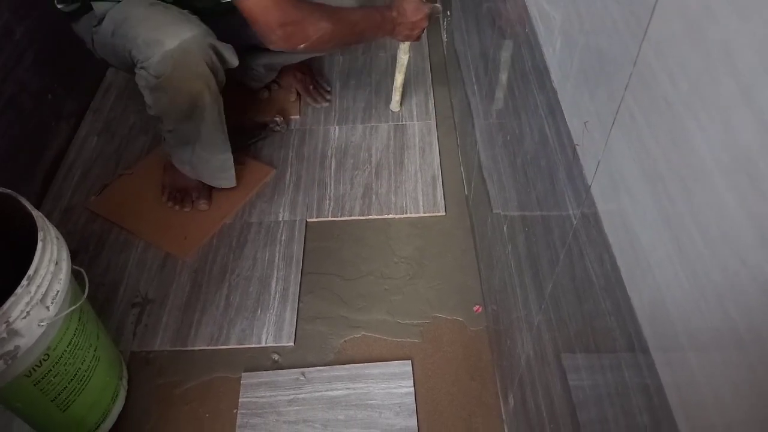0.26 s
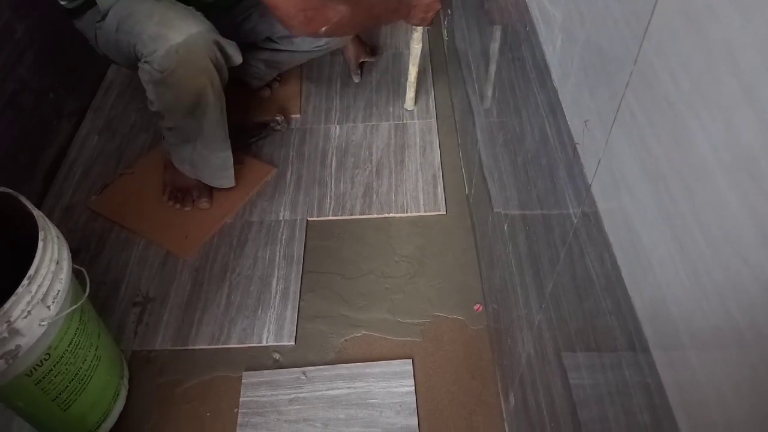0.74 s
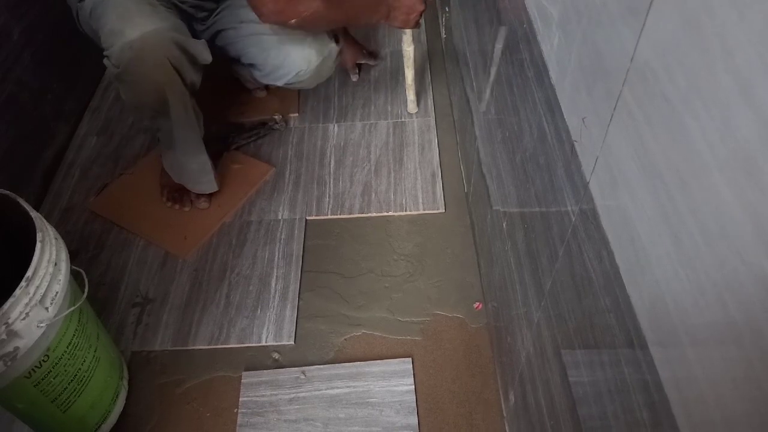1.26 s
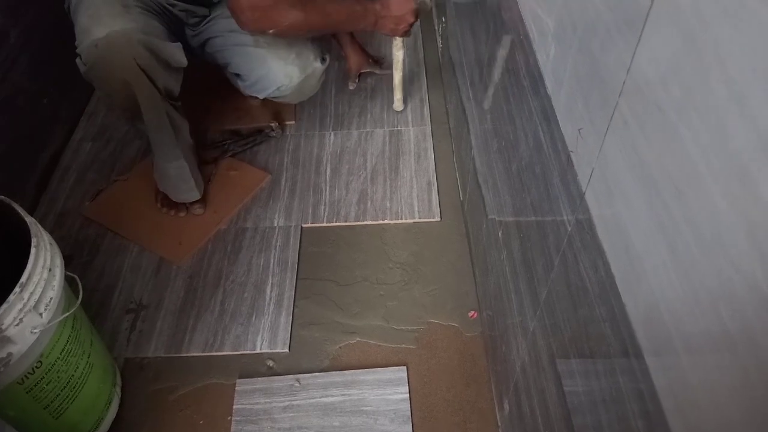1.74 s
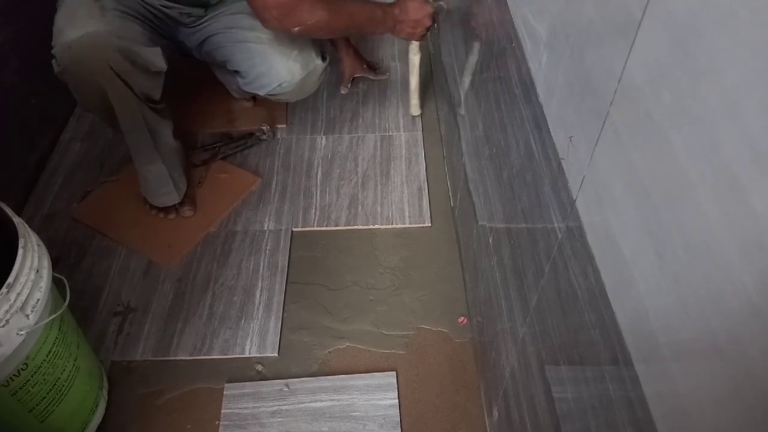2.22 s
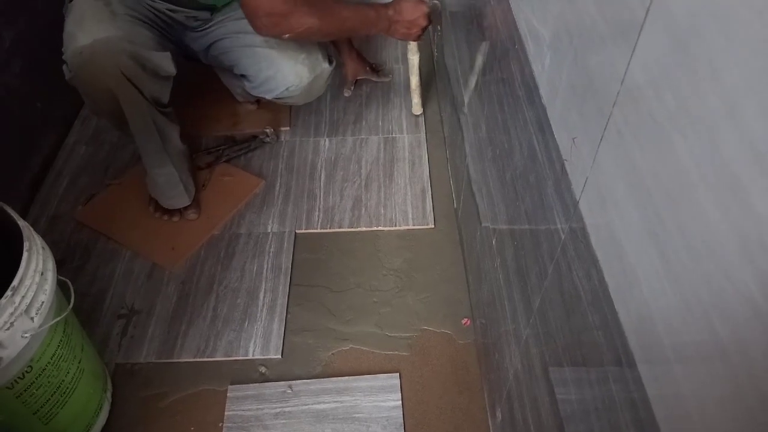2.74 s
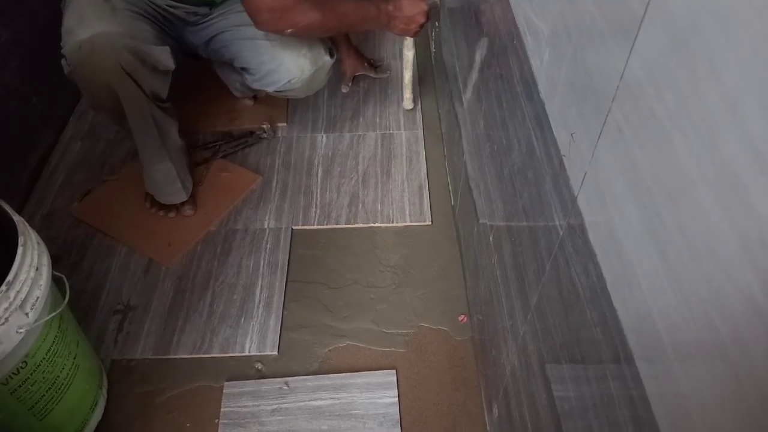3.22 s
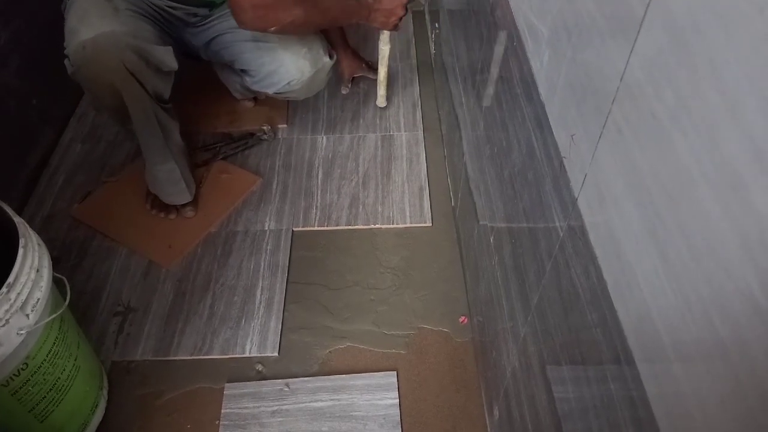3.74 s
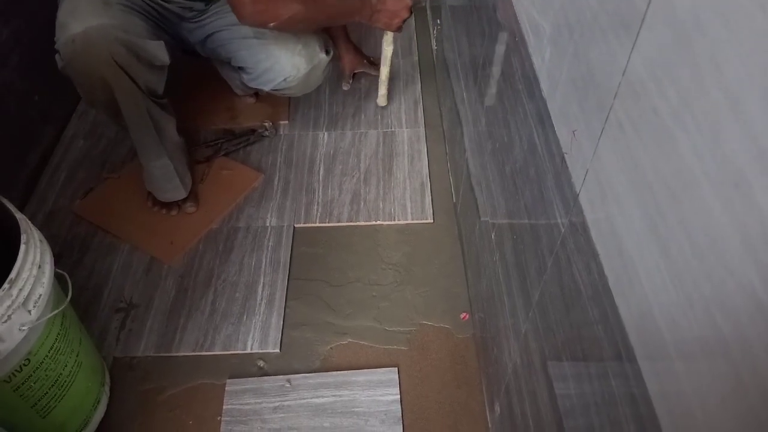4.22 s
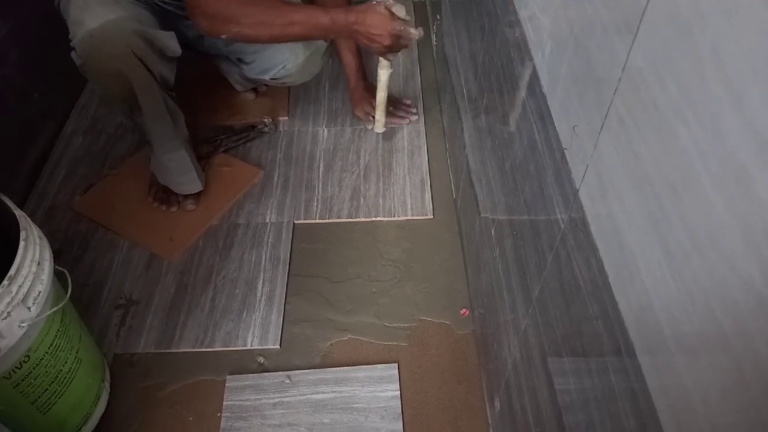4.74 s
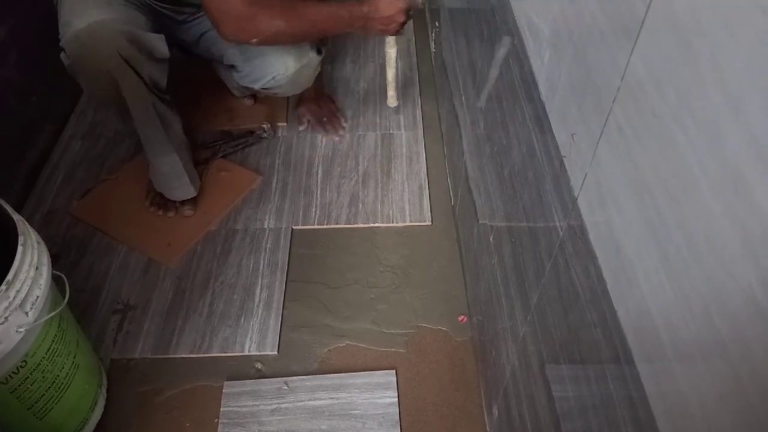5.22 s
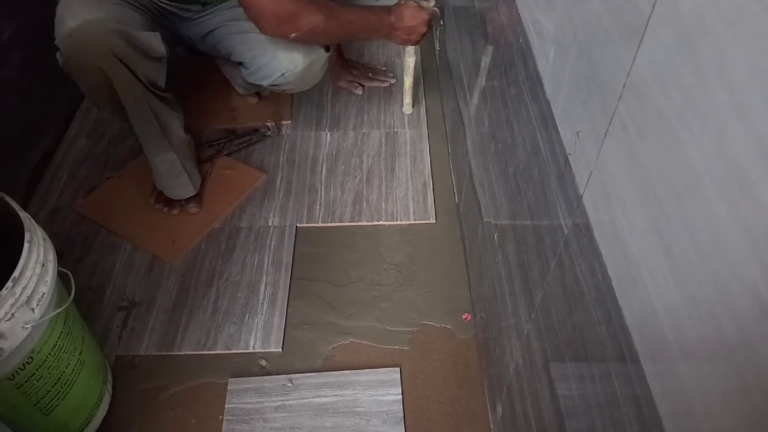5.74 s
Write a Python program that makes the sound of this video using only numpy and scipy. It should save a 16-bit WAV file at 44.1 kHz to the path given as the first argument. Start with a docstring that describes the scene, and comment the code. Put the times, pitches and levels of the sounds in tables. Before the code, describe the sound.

Quick, regular mallet knocks on a floor tile, close and loud, with hard room reflections and an occasional tiny high chink. They stop around four seconds, a soft scuff passes, and a final pair follows before faint distant tones. Low engine throb and drone, dark rumble and unsteady thin hiss lie beneath. Left channel holds the scene; right holds only steady electrical noise.

```python
"""An engine idles outside over a low rumble and a wavering hiss; the right channel is steady circuit noise.
A tiler then beds a floor tile in mortar with quick mallet knocks: short dead rings filling a small bare room.
A soft scuff falls in the pause, two more knocks follow, and faint far-off tones come in at the end.
Tile and room are damped sines, echoes and hiss are coloured noise, the engine is filtered pulses and a sine.
The microphone feeds the left channel only."""
import sys
import numpy as np
from scipy import signal
from scipy.fft import rfft, irfft
from scipy.io import wavfile
from scipy.ndimage import uniform_filter1d

SR = 44100
rng = np.random.default_rng(int(sys.argv[2]) if len(sys.argv) > 2 else 0)


def transcribe(signal):
    """Save signal, clipped to [-1, 1], as a 16-bit WAV file at the path in sys.argv[1]."""
    frames = np.atleast_2d(signal).T
    limited = np.clip(frames, -1, 1)
    pcm = np.round(limited * 32767).astype(np.int16)
    wavfile.write(sys.argv[1], SR, pcm)


N = 263718
TIME = np.arange(N) / SR
RING = TIME[:SR]  # one second, the time axis of every ring
# how long the room's echoes ring: (frequency [Hz], t60 [s])
ECHO_T60 = [(100, 0.75), (250, 0.48), (700, 0.46), (1500, 0.34), (4000, 0.38), (10000, 0.24)]


def undb(db):
    """Decibels to gain."""
    return 10 ** (np.asarray(db) / 20)


def at_hz(hz, points):
    """Read (frequency [Hz], value) points on a log-frequency axis."""
    point_hz, value = np.transpose(points)
    return np.interp(np.log(np.maximum(hz, 1)), np.log(point_hz), value)


def at_time(points):
    """Draw a level envelope through (time [s], level [dB]) points."""
    return np.interp(TIME, *np.transpose(points))


def level(x, db):
    """Bring to an rms of 1, then apply a fixed or moving gain in dB."""
    return x * undb(db) / np.sqrt(np.mean(x ** 2))


def colour(x, points):
    """Equalise through (frequency [Hz], gain [dB]) points, minimum-phase so nothing rings ahead."""
    size = 8192
    hz = np.arange(size // 2 + 1) * SR / size
    # folding the cepstrum onto positive time makes the filter causal
    cepstrum = irfft(np.log(undb(at_hz(hz, points))))
    cepstrum[1:size // 2] *= 2
    cepstrum[size // 2 + 1:] = 0
    impulse = irfft(np.exp(rfft(cepstrum)))
    return signal.fftconvolve(x, impulse)[:len(x)]


def noise(points, db):
    """Random noise of a given colour and level."""
    return level(colour(rng.standard_normal(N), points), db)


def swell(start, length):
    """A smooth half-sine rise and fall."""
    return np.sin(np.pi * np.clip((TIME - start) / length, 0, 1))


def fade(t60):
    """Exponential decay, 60 dB down after t60 seconds."""
    return np.exp(-np.log(1000) * RING / t60)


def mode(hz, db, t60):
    """One damped vibration: a sine that dies away."""
    return undb(db) * np.sin(2 * np.pi * hz * RING) * fade(t60)


def low_pass(x, hz):
    """Gently round off everything above a frequency."""
    return signal.sosfilt(signal.butter(2, hz, fs=SR, output="sos"), x)


def add(out, start, x):
    """Mix a sound in at a time in seconds."""
    first = int(start * SR)
    out[first:first + len(x)] += x


def engine(firing_hz=16.15, drone_order=10, unevenness_db=0.6):
    """Evenly timed firings throb through the walls; one of their overtones drones in the room."""
    # level of the idling engine: (time [s], throb level [dB], drone level [dB])
    idle = [(0, -46.5, -58), (1.001, -42.5, -47), (2.5, -44.5, -45), (4.2, -42.5, -43.5),
            (4.55, -47, -39.5), (5.0, -41.5, -37), (5.55, -38, -42), (5.98, -37.5, -38)]
    # the engine as it comes through the walls: (frequency [Hz], gain [dB])
    through_walls = [(40, -55.5), (70, -39), (85, -9.5), (115, -2), (160, 2.5), (185, -1.5), (215, -23),
                     (247, -5), (280, -13.5), (450, -27.5), (900, -53.5)]
    start, throb_db, drone_db = np.transpose(idle)
    turns = firing_hz * TIME
    firings = np.flatnonzero(np.diff(np.floor(turns)))
    pulses = np.zeros(N)
    pulses[firings] = undb(unevenness_db * rng.standard_normal(len(firings)))
    throb = level(colour(pulses, through_walls), np.interp(TIME, start, throb_db))
    drone = np.sin(2 * np.pi * drone_order * turns)
    return throb + level(drone, np.interp(TIME, start, drone_db))


def hiss(trim_db=-1):
    """Thin coloured noise that swells and sinks during the knocking and is steadier in the pause."""
    # movement of the hiss ahead of the trim: (time [s], level [dB])
    hiss_level = [(0.0, -48), (0.42, -53), (0.53, -43.5), (0.78, -54.5), (1.14, -55.5), (1.32, -47),
                  (1.58, -58.5), (1.84, -44), (2.18, -54), (2.48, -56), (2.68, -40), (2.97, -56.5),
                  (3.23, -42), (3.48, -51), (3.99, -62.5), (4.28, -39.5), (4.42, -44.5), (5.12, -42),
                  (5.25, -48.0), (5.98, -40.8)]
    # its colour: (frequency [Hz], gain [dB])
    hiss_colour = [(300, -12), (1500, -8), (3000, -7), (4400, 0.5), (5000, -7.5), (5900, -9), (6300, 3.5),
                   (7500, 2), (8400, -2.5), (8900, -16.5), (11000, -12), (12500, -9.5), (15500, -11.5)]
    return noise(hiss_colour, trim_db + at_time(hiss_level))


def rumble():
    """Distant outdoor rumble: dark noise with a slowly moving level."""
    # colour of the rumble: (frequency [Hz], gain [dB])
    rumble_colour = [(25, -7), (55, -15), (100, 3), (170, -1), (270, -8.5), (400, -17.5), (700, -15.5),
                     (1200, -20), (2500, -28.5), (6000, -46)]
    # its loudness: (time [s], level [dB])
    rumble_level = [(0, -46), (2.3, -42), (2.7, -39), (4.4, -43), (5.98, -38.5)]
    return noise(rumble_colour, at_time(rumble_level))


def circuit_noise():
    """Steady electronic noise of the idle right channel."""
    # colour of the circuit noise: (frequency [Hz], gain [dB])
    circuit_colour = [(30, -52), (60, -26), (120, 2), (200, -3), (400, -2.5), (1000, -7), (3000, -10.5),
                      (6000, -14.5), (10000, -25), (12500, -17.5), (15500, -18)]
    return noise(circuit_colour, db=-49.0)


def tile_ring(drift, spot_db, head_hz):
    """The tile's modes, damped by the mortar bed; a slight drift of aim favours other modes."""
    # vibrations of the bedded tile: (frequency [Hz], relative level [dB], t60 [s])
    tile_modes = [(296.7, -19, 0.056), (494, -9.5, 0.029), (820.3, -5.5, 0.021), (953, -7, 0.017),
                  (1077, -35, 0.027), (1462, -15.5, 0.052), (1720, -66, 0.013), (2240, -16, 0.0073),
                  (2910, -23, 0.03), (3680, -18.5, 0.013)]
    ring = 0
    for k, (hz, db, t60) in enumerate(tile_modes):
        ring = ring + mode(hz, db + spot_db * np.cos(drift * (k + 1)), t60)
    # the tile is pushed away first, so the pressure dips; the mallet's head gives a little
    return low_pass(-ring, head_hz)


def echoed(x, trim_db):
    """Add the first distinct echoes as delayed copies."""
    # echoes from the near wall, the ceiling and the far walls, ahead of the trim: (delay [s], level [dB])
    echoes = [(.0046, -13.5), (.0125, -18.5), (.0165, -47), (.0265, -14), (.033, -10), (.073, -18.5)]
    return x + sum(undb(db + trim_db) * np.interp(RING - delay, RING, x, left=0) for delay, db in echoes)


def standing_waves(t60_scale=0.81):
    """The room's own resonances, each a damped sine."""
    # standing waves of the room: (frequency [Hz], relative level [dB])
    room_modes = [(87, -27), (154, -20), (182.5, -14), (206, -50), (222, -28), (233, -78), (289, -43),
                  (310, -21.5), (326, -17.5), (374, -29), (395, -22), (410, -28.5), (472, -44), (524, -37),
                  (573, -29), (621, -27), (643, -20.5), (668, -22), (707, -28.5), (735, -27), (802, -24),
                  (851, -44), (881, -29), (906, -23), (936, -25), (1005, -30.5), (1074, -43.5), (1490, -45),
                  (1743, -27)]
    # neighbours start in opposition, so the room's boom builds up after the blow
    return sum((-1) ** k * mode(hz, db, t60_scale * at_hz(hz, ECHO_T60))
               for k, (hz, db) in enumerate(room_modes))


def reflections(early_db, early_t60, arrival_s, lumpy_db):
    """Dense echoes of uneven size: a burst from the nearest surfaces, then a tail fading band by band."""
    # colour of the scattered reflections: (frequency [Hz], gain [dB])
    wall_colour = [(40, -50.5), (115, -27), (170, -1), (260, 2.5), (950, -5), (1300, -6), (1650, -6.5),
                   (2000, -12), (2900, -16.5), (4600, -20), (5100, -30), (7400, -25), (9000, -38),
                   (15500, -40)]
    # each echo size holds for 100 samples
    sizes = undb(lumpy_db * np.repeat(rng.standard_normal(len(RING) // 100), 100))
    spectrum = rfft(level(sizes * rng.standard_normal(len(RING)), 0))
    hz = np.arange(len(RING) // 2 + 1)
    centres = np.geomspace(60, 15000, 17)
    tail = 0
    for centre, pick in zip(centres, np.eye(len(centres))):
        band = irfft(spectrum * at_hz(hz, np.column_stack([centres, pick])))
        decay = fade(at_hz(centre, ECHO_T60)) + undb(early_db) * fade(early_t60)
        tail = tail + band * decay
    onset = 1 - np.exp(-(RING / arrival_s) ** 2)
    return colour(tail * onset, wall_colour)


def chinks(out, t60=0.093):
    """On some blows the tile's edge chinks against its neighbour: one high damped sine."""
    # the chinks: (time [s], frequency [Hz], level [dB])
    edge_chinks = [(0.321, 4577, -33), (2.529, 4610, -26), (2.783, 4400, -25.5), (4.008, 4500, -27.5),
                   (5.374, 4690, -32)]
    for start, hz, db in edge_chinks:
        add(out, start, mode(hz, db, t60))


def knocks(tile_db=1.5, room_db=-3.0, scatter_db=-4.0, spot_db=2, head_hz=4200, far_wall_db=-7):
    """Every blow rings the same tile and room; its hardness and the spot it lands on change the colour."""
    # mallet blows: (time [s], strength [dB], hardness as extra treble [dB], spot struck)
    blows = [(0.3166, 0.5, 0, "middle"), (0.6561, 0, 0, "middle"), (0.9549, 0.5, -2.5, "middle"),
             (1.233, -0.2, 0.5, "edge"), (1.5031, -0.5, 0, "edge"), (1.7596, -0.3, -0.5, "bedded"),
             (2.0166, -1.34, 1, "bedded"), (2.2801, -0.7, 0.3, "bedded"), (2.5264, 0.46, 0.3, "bedded"),
             (2.7758, 0.5, 0.8, "bedded"), (3.0294, -1, 2, "bedded"), (3.2842, -0.8, -0.1, "edge"),
             (3.5278, 0, 0, "hollow"), (3.7785, -0.1, -0.4, "hollow"), (4.0066, 0, 1, "hollow"),
             (5.1648, -0.6, -0.9, "bedded"), (5.372, -0.76, 2.2, "bedded")]
    # how each spot of the tile colours a blow, by name: (frequency [Hz], gain [dB])
    spot_colours = {"middle": [(90, -4), (180, -1), (300, 0.5), (450, -3), (650, 1.5), (870, 0),
                    (1150, 0.5), (1600, -1.5), (2900, 2), (4500, -1)], "edge": [(90, -0.5), (180, 0.2),
                    (300, -3), (450, -3), (650, -2), (870, -1.5), (1150, 3), (1600, 3), (2400, -0.5),
                    (4500, -0.5)], "bedded": [(180, -0.4), (300, 2), (450, -1), (650, 0.5), (870, 0.5),
                    (1150, -1.5), (1600, -2.5), (2400, 2.1), (4500, -1)], "hollow": [(180, -2.5), (300, -7),
                    (450, 0), (650, 1.5), (870, 4.5), (1150, 0), (1600, 0), (2400, 1.5), (4500, -0.5)]}
    hard_from_hz, hard_full_hz = 590, 2540  # hardness lifts the treble from here, fully above there
    room = standing_waves()
    here, there = (reflections(early_db=5.5, early_t60=0.069, arrival_s=0.00083, lumpy_db=1.5)
                   for _ in range(2))
    # the strongest standing wave surges once more, back from the far end of the room
    returning = swell(0.111, 0.024)[:len(RING)] * mode(182, -6.5, 0.64)
    space = undb(room_db) * room + undb(far_wall_db) * returning
    drifts = np.cumsum(0.6 * rng.standard_normal(len(blows)))  # wandering aim, as an angle in radians
    out = np.zeros(N + len(RING))
    for (start, strength_db, hard_db, spot), drift in zip(blows, drifts):
        tile = echoed(tile_ring(drift, spot_db, head_hz), trim_db=-2.5)
        # the echo pattern shifts as the mallet wanders
        scatter = np.cos(drift) * here + np.sin(drift) * there
        knock = undb(tile_db) * tile + space + undb(scatter_db) * scatter
        contact = [(hard_from_hz, strength_db), (hard_full_hz, strength_db + hard_db)]
        add(out, start, colour(colour(knock, spot_colours[spot]), contact))
    chinks(out)
    return out[:N]


def scuff(start=4.17, length=0.33):
    """A soft scuff in the pause: coloured noise under a smooth swell."""
    # colour of the scuff: (frequency [Hz], gain [dB])
    scuff_colour = [(200, -8), (290, 4), (350, -16), (430, -2), (550, 6), (660, -9), (760, -12),
                    (1500, -31), (4000, -39), (8000, -36)]
    return swell(start, length) * noise(scuff_colour, db=-40.5)


def far_tones(waver_hz=6):
    """Faint sines of unsteady pitch that swell up in the distance."""
    # far-off tones: (time [s], length [s], frequency [Hz], peak level [dB])
    tones = [(5.5, .24, 945, -53), (5.86, .13, 718, -40)]
    waver = waver_hz * level(uniform_filter1d(rng.standard_normal(N), size=700), 0)
    out = np.zeros(N)
    for start, length, hz, db in tones:
        phase = 2 * np.pi * np.cumsum(hz + waver) / SR
        out += undb(db) * swell(start, length) * np.sin(phase)
    return out


def scene(low_cut_hz=88):
    """Left: the room through the microphone's low cut, plus hiss and rumble; right: circuit noise."""
    air = engine() + knocks() + scuff() + far_tones()
    microphone = signal.sosfilt(signal.butter(6, low_cut_hz, "high", fs=SR, output="sos"), air)
    return np.array([microphone + hiss() + rumble(), circuit_noise()])


def record(dry, low_cut_hz=45, top_hz=15900):
    """Peaks round off softly towards full scale; then the lowest bass and the top are cut."""
    rounded = dry / (1 + dry ** 4) ** (1 / 4)
    rounded = signal.sosfilt(signal.butter(2, low_cut_hz, "high", fs=SR, output="sos"), rounded)
    return signal.sosfilt(signal.ellip(8, .2, 70, top_hz, fs=SR, output="sos"), rounded)


dry = scene()
out = record(dry)
transcribe(out)
```